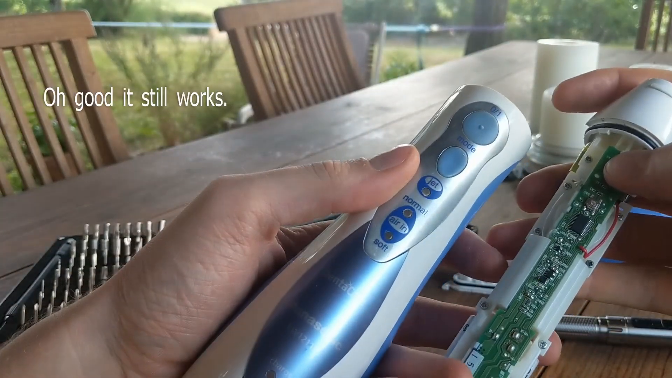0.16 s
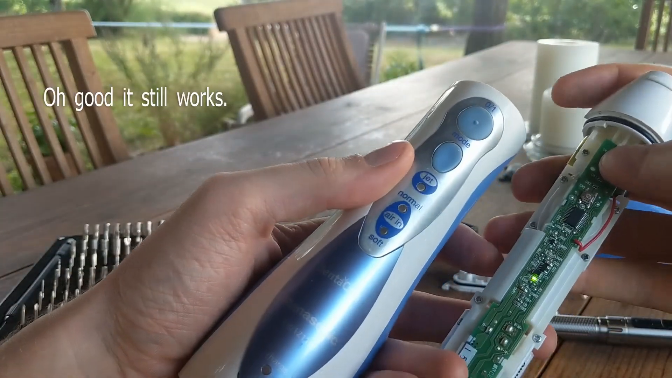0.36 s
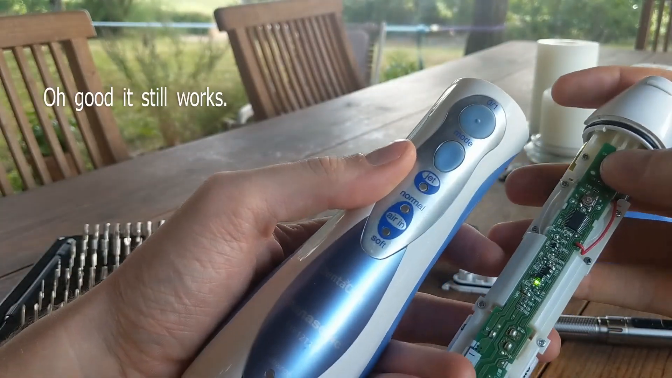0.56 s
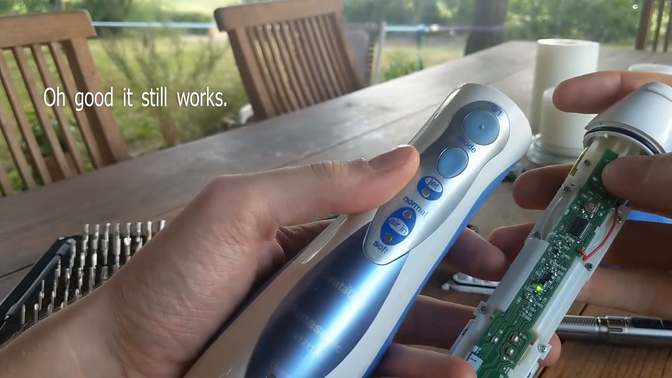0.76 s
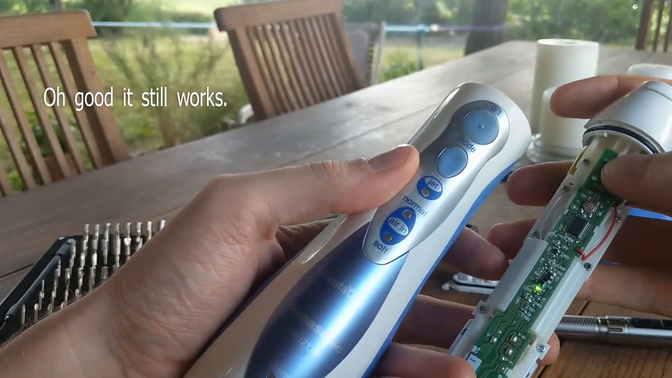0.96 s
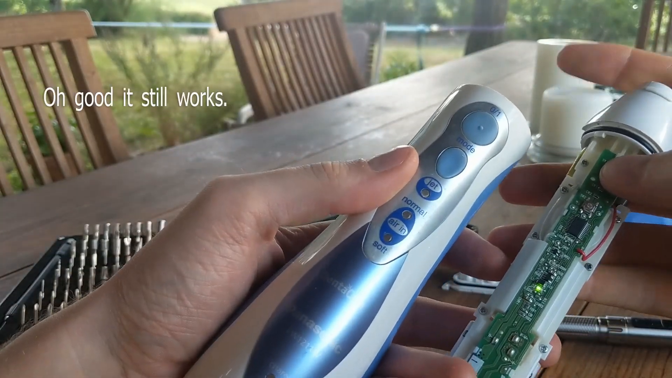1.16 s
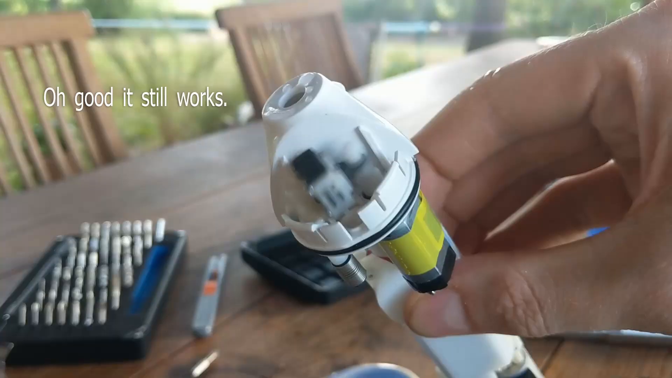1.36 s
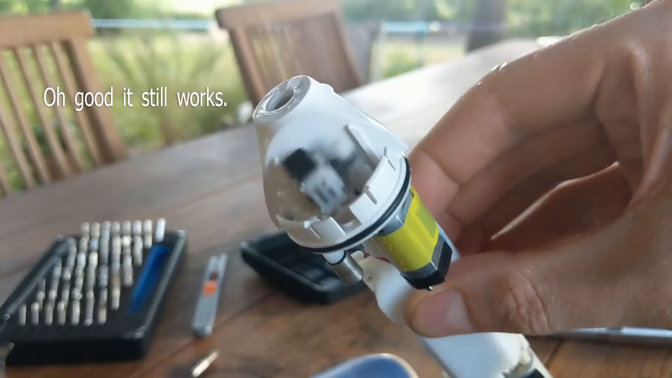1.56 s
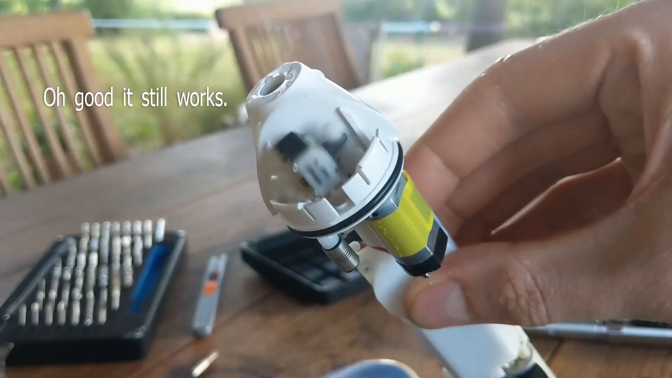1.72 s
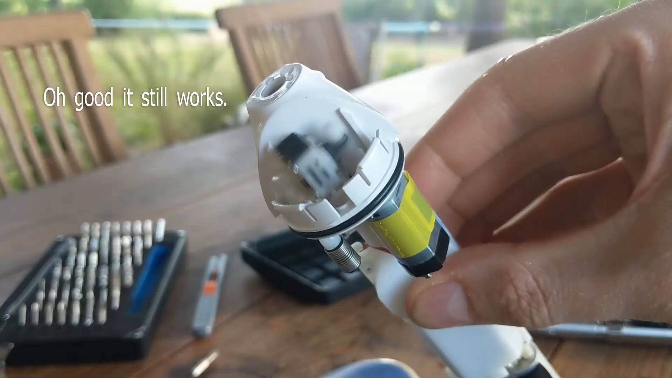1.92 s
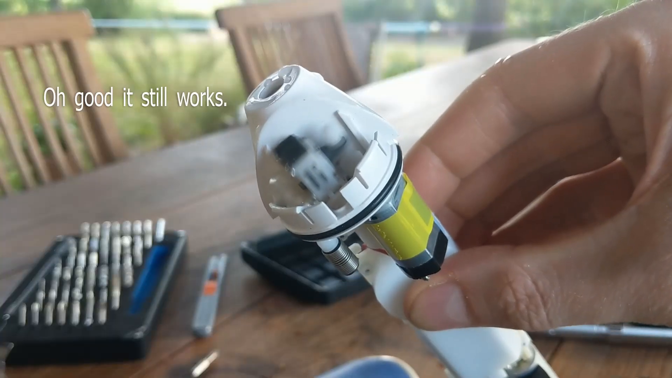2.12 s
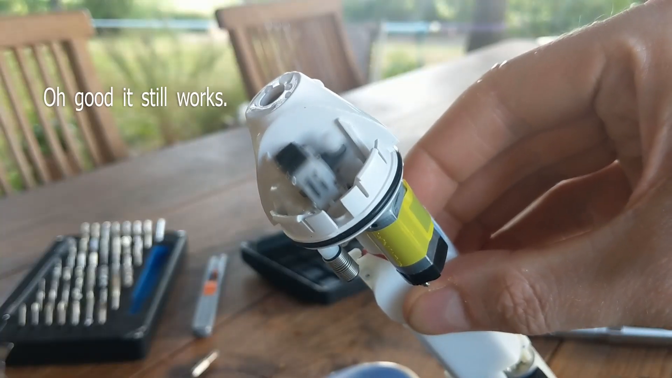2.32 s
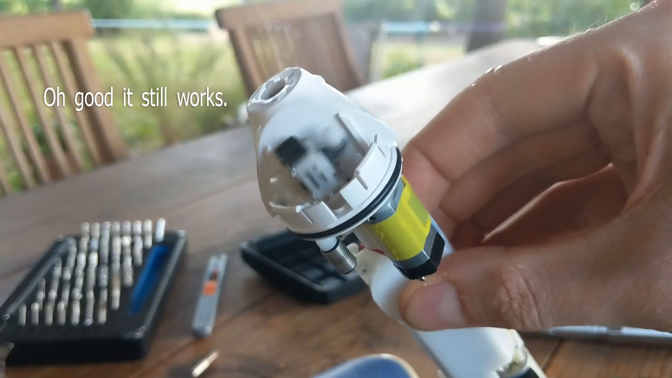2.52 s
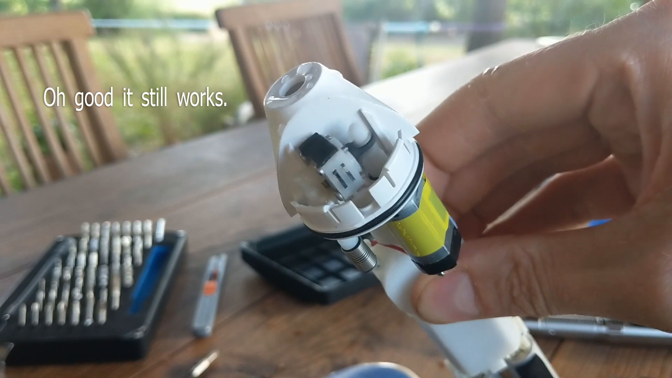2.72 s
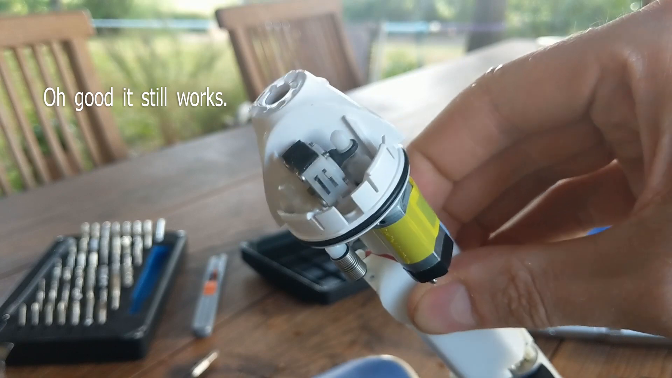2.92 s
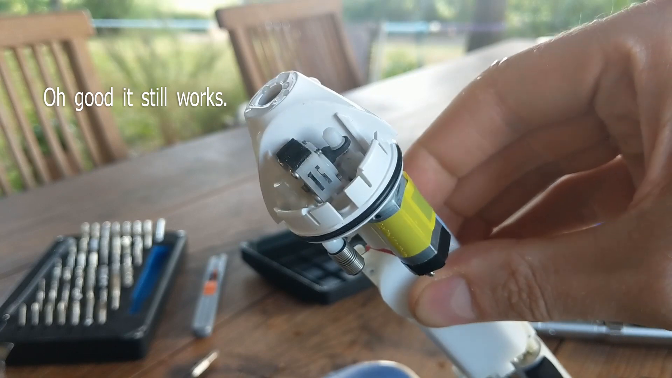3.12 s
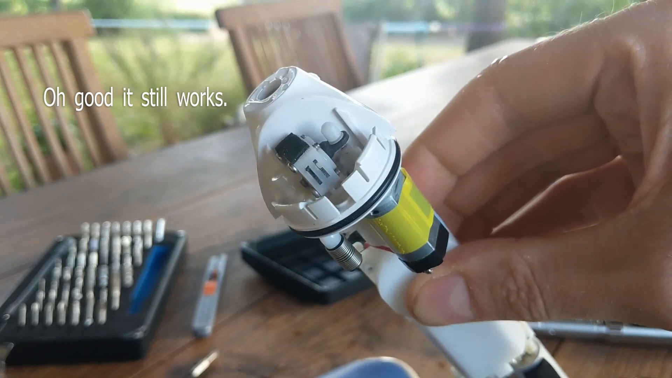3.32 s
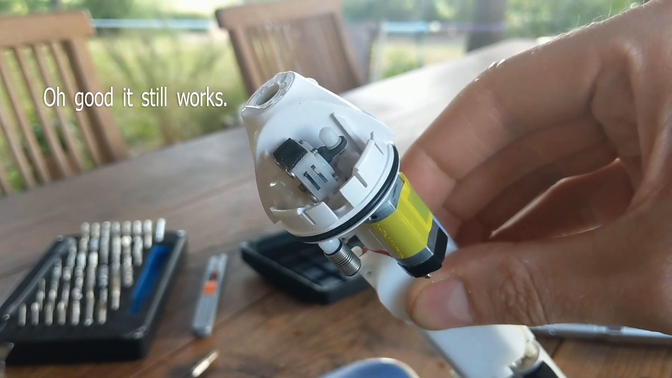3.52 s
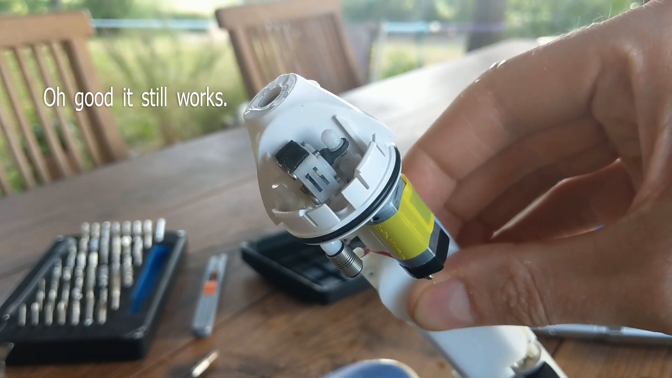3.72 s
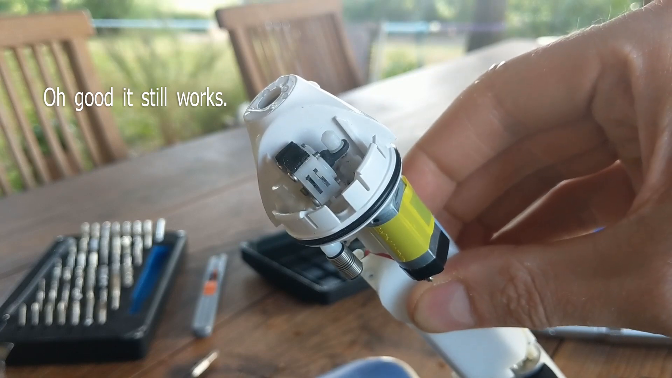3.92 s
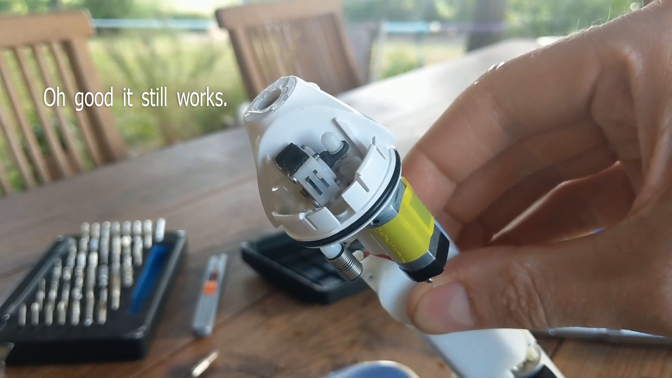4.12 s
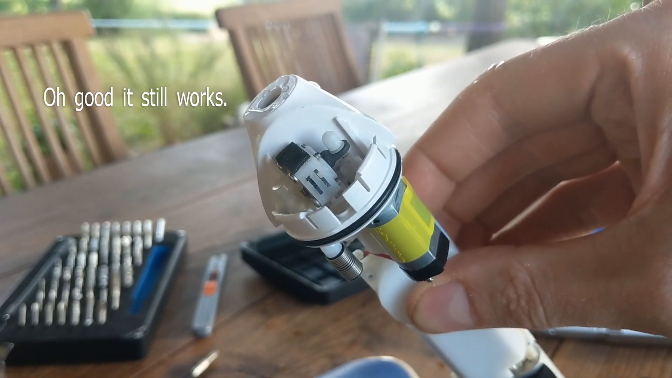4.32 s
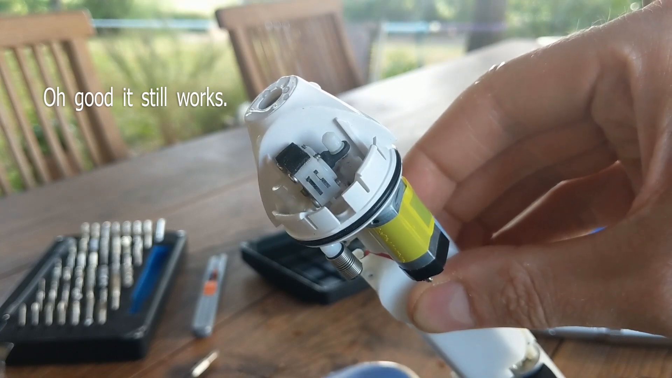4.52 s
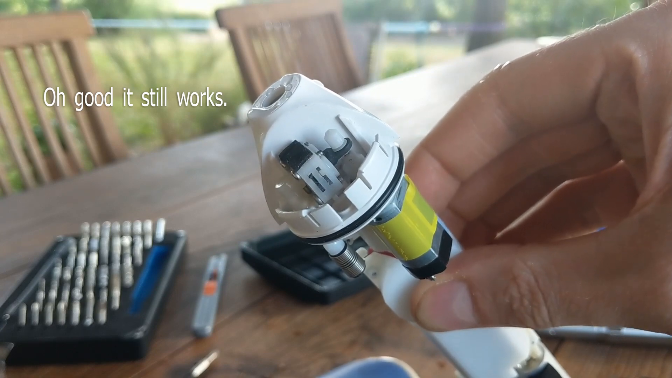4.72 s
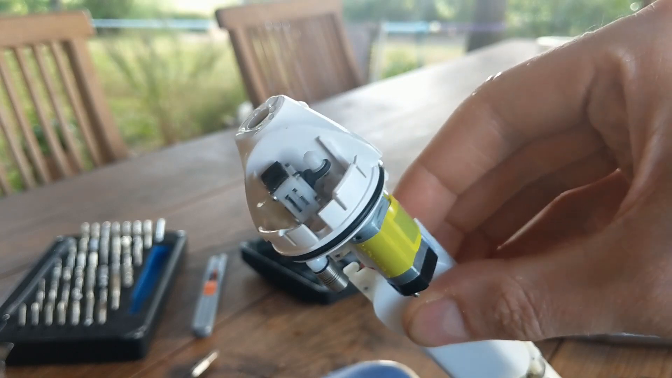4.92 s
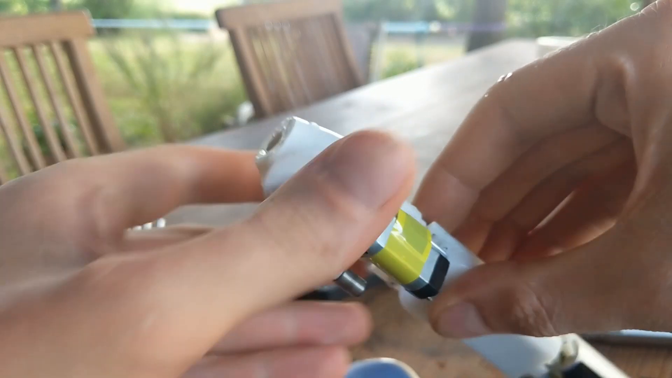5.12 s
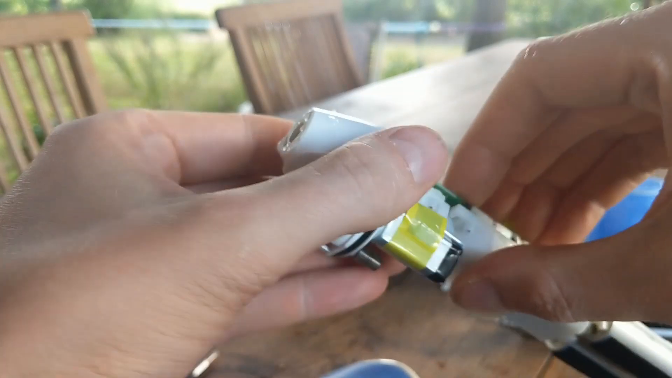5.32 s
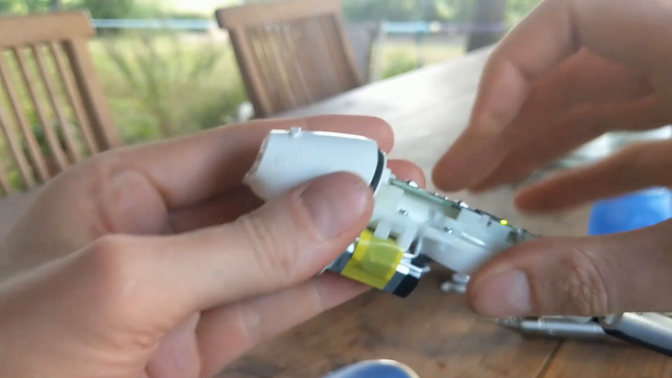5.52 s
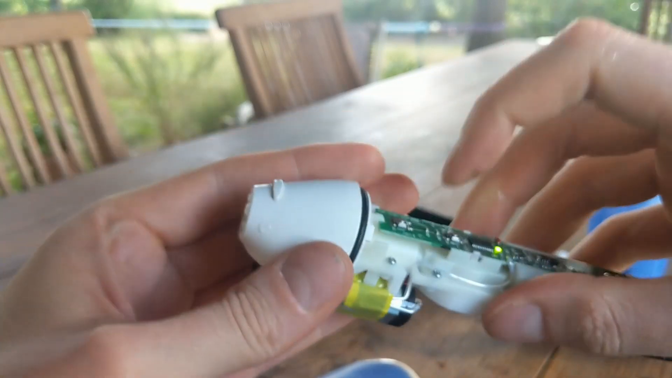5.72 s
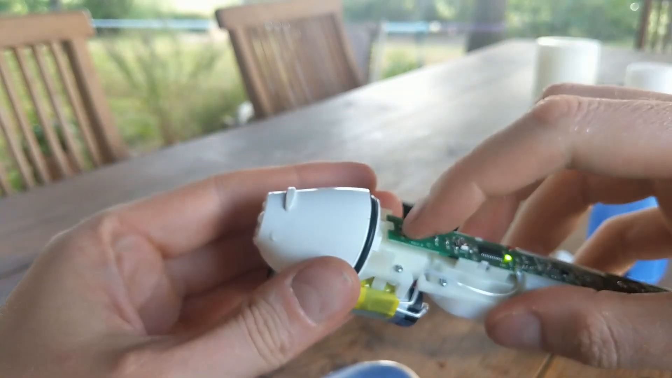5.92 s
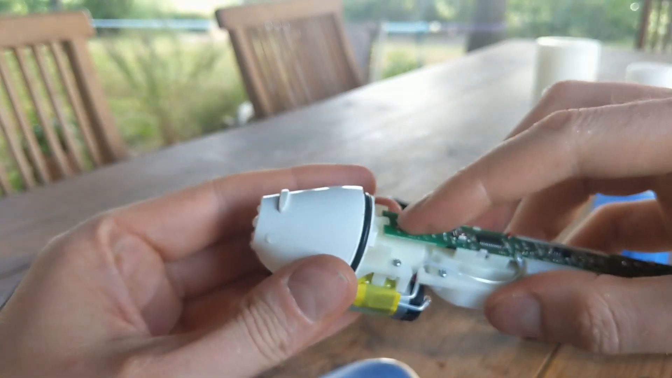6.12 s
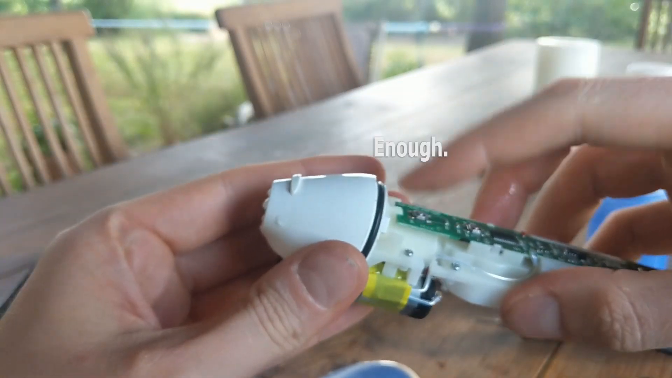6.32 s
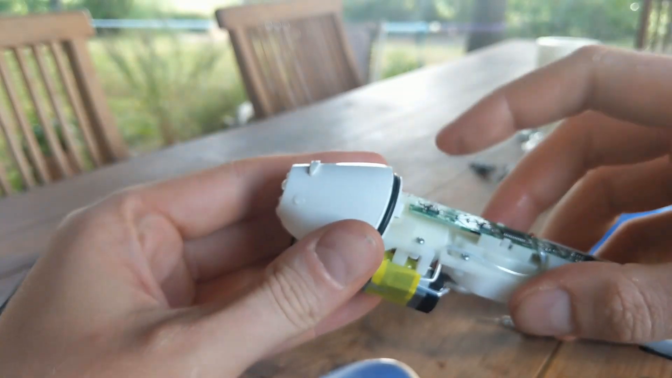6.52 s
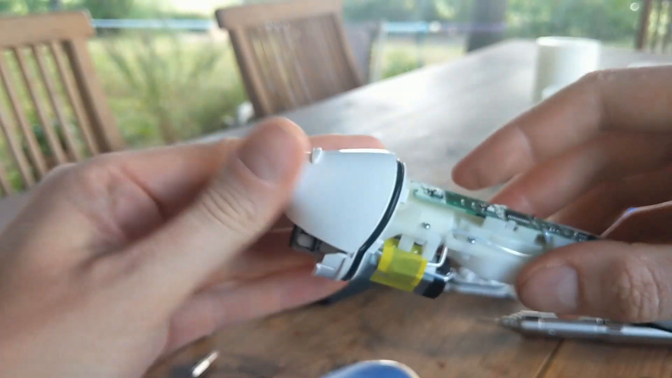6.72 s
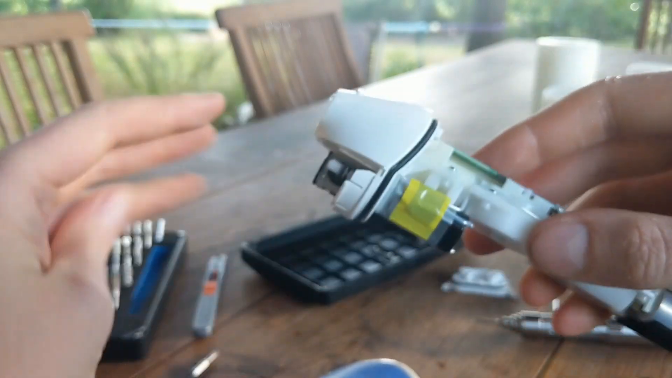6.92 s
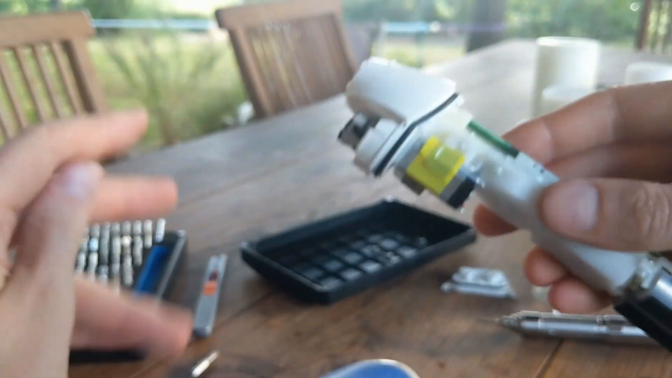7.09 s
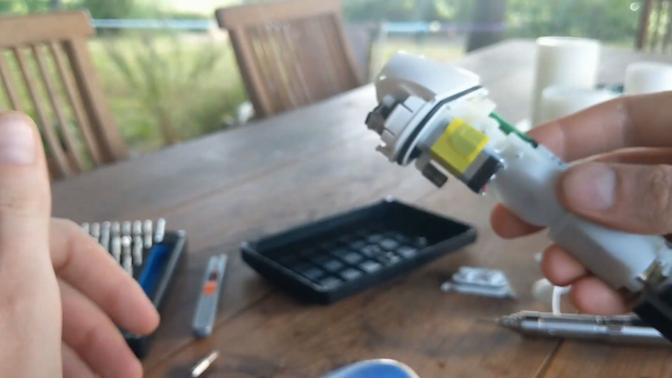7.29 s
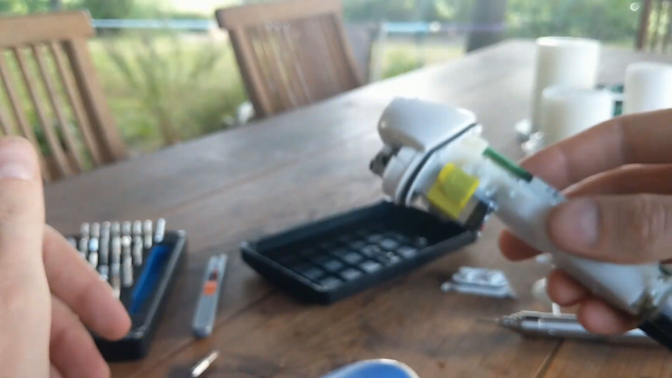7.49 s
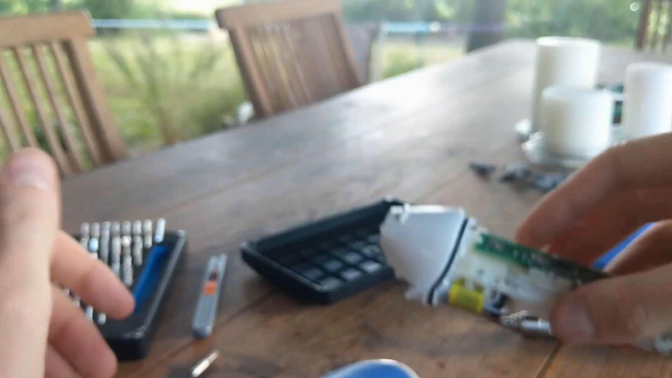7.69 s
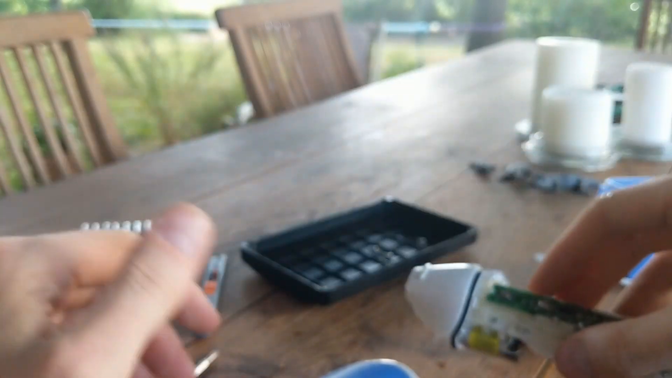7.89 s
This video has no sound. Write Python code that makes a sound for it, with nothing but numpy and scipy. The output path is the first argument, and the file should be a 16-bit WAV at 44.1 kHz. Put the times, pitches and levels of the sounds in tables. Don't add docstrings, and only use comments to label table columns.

```python
import sys
import numpy as np
from scipy import signal
from scipy.fft import rfft, irfft
from scipy.io import wavfile
from scipy.ndimage import map_coordinates

SR = 44100
rng = np.random.default_rng(int(sys.argv[2]) if len(sys.argv) > 2 else 0)


def volts_from_decibels(level):
    exponent = np.asarray(level, float) / 20
    return 10 ** exponent


def materialize(psi):
    bounded = np.clip(np.atleast_2d(psi).T, -1, 1)
    quanta = np.round(bounded * 32767).astype(np.int16)
    wavfile.write(sys.argv[1], SR, quanta)


N = 350639

CLOSER_S = 1.392
PUMP_ON_S, PUMP_OFF_S = 3.3, 6.27
# first_shift_s, second_shift_s
GRIP_SHIFTS = [(4.15, 5.67), (4.15, 5.68), (5.0, 5.47), (5.0, 5.6)]


def in_time(rows, fade=0.0039):
    t = np.arange(N) / SR
    s, *columns = np.transpose(rows)
    gate = np.clip(np.minimum(t - s[0], s[-1] - t) / fade, 0, 1)
    return [np.interp(t, s, c) for c in columns] + [gate]


def unit(x, gate=None):
    return x / np.sqrt(np.average(x ** 2, weights=gate) + 1e-20)


def after(s, fade=0.045):
    return np.clip((np.arange(N) / SR - s) / fade + .5, 0, 1)


def blend(share, old, new):
    return old + share * (new - old)


def drift(rate):
    knots = rng.standard_normal(round(rate * N / SR) + 2)
    return map_coordinates(knots, [np.linspace(0, len(knots) - 1, N)], order=3)


def body(x, modes):
    out = np.zeros(N)
    for k, (hz, width, level_db) in enumerate(modes):
        r = np.exp(-np.pi * width / SR)
        b = [(1 - r * r) / 2, 0, (r * r - 1) / 2]
        a = [1, -2 * r * np.cos(2 * np.pi * hz / SR), r * r]
        out += (-1) ** k * volts_from_decibels(level_db) * signal.lfilter(b, a, x + 1e-18)
    return out


def twice(x, hz, first_width, second_width):
    return body(body(x, [(hz, first_width, 0)]), [(hz, second_width, 0)])


def band(x, low_hz, high_hz, order=3):
    return signal.sosfilt(signal.butter(order, [low_hz, high_hz], "band", fs=SR, output="sos"), x)


def strikes(phase, spread_db):
    at = np.flatnonzero(np.diff(np.floor(phase)) > 0)
    late = np.clip((np.ceil(phase[at]) - phase[at]) / (phase[at + 1] - phase[at]), 0, 1)
    size = volts_from_decibels(spread_db * rng.standard_normal(size=2000)[:len(at)])
    out = np.zeros(N)
    out[at], out[at + 1] = size * (1 - late), size * late
    return out


def rebounds(tick, rows):
    return sum(volts_from_decibels(level_db) * np.roll(tick, round(s * SR)) for s, level_db in rows)


def surface(phase, cells, rough, grain_db=9.5):
    def bumps(size):
        height_db = grain_db * np.minimum(rng.exponential(1, size), 5)
        return unit(volts_from_decibels(height_db) * rng.choice([-1, 1], size))
    worn = bumps(cells)
    same = np.interp(phase % 1 * cells, np.arange(cells + 1), np.r_[worn, worn[0]])
    rough = np.clip(rough, 0, 1)
    return np.sqrt(1 - rough) * same + np.sqrt(rough) * bumps(N)


def load(strokes, column, rest_db):
    # start_strokes, length_strokes, knock_db, rasp_db
    pressure = [(0.217, 0.073, -1.5, -4), (.3, 0.34, -10, -36), (0.749, 0.28, -2.5, -6.5),
                (1.21, 0.15, -4, -11.5), (1.3, 0.32, -2, -71), (1.749, 0.293, -3, -7.5)]
    out = volts_from_decibels(rest_db)
    for row in pressure:
        since = (strokes % 2 - row[0]) % 2
        edge = np.minimum(since / 0.03, (row[1] - since) / 0.035)
        out = out + volts_from_decibels(row[column]) * np.clip(edge, 0, 1)
    return out


def garden():
    # hz, level_db
    air_curve = [(12, -91), (20, -28), (74, -4), (107, -12.5), (153, -17.5), (171, -19.5), (214, -17.5),
                 (253, -22.5), (749, -26), (1550, -30), (1830, -33.5), (1990, -31), (15600, -45)]
    # hz, width_hz, level_db
    drone_tones = [(65.7, 22, -12.5), (115.5, 72, -12.5), (211.4, 4.4, -16.5), (1223, 8.3, -28),
                   (1850, 46, -27)]
    t, hz = np.arange(N) / SR, np.arange(N // 2 + 1) * SR / N + 1
    at, level_db = np.transpose(air_curve)
    air_shape = volts_from_decibels(np.interp(np.log(hz), np.log(at), level_db))
    air = irfft(rfft(rng.standard_normal(N)) * air_shape, N)
    air = air / np.std(band(air, 124, 22000))
    noise = rng.standard_normal(N)
    drone = sum(volts_from_decibels(d) * unit(twice(noise, f, w, w)) for f, w, d in drone_tones)
    near = after(CLOSER_S, fade=0.054)
    drone_hz = blend(near, 68.69, 71.4) + 0.91 * drift(1.5)
    swell_db = 3.5 * np.exp(-(t - 6.2) ** 2)
    drone_db = blend(near, -80, -65.5) + 1.9 * drift(1.1) + swell_db
    drone = drone + np.sin(2 * np.pi * np.cumsum(drone_hz) / SR)
    return volts_from_decibels(-70) * air + volts_from_decibels(drone_db + 3.0) * drone


def first_controls():
    # time_s, turns_per_s
    speed_far = [(.347, 132), (.394, 133.5), (.454, 133.7), (.525, 141.8), (.55, 134.6), (.612, 137.9),
                 (.64, 136.5), (.678, 140.4), (.73, 141.9), (.76, 127.9), (.932, 134.7), (1.008, 139.5),
                 (1.108, 135.2), (1.302, 133.7), (1.39, 135)]
    speed_near = [(1.4, 137.6), (1.468, 136.1), (1.504, 144.5), (1.562, 143.2), (1.658, 144.3),
                  (1.714, 142.7), (1.784, 143.7), (1.848, 142), (1.88, 142.9), (1.906, 128.5),
                  (1.93, 128.2), (1.958, 132.7), (2.112, 131.3), (2.25, 133), (2.646, 132.6),
                  (2.686, 131.2), (2.855, 130.7)]
    # time_s, level_db
    level_far = [(.347, -44), (.456, -41.5), (.522, -42.5), (.558, -42), (.73, -42.5), (.768, -46.5),
                 (1.012, -42), (1.136, -45), (1.39, -46)]
    level_near = [(1.401, -37), (1.468, -39), (1.503, -34), (1.878, -35), (1.902, -45), (2.25, -43),
                  (2.649, -42), (2.69, -43), (2.857, -41.5)]
    # from_s, to_s, onset_s
    drag_times = [
        (.86, 1.51, .12),
        (1.89, 2.83, .03),
    ]
    drag_levels = [-56.5, -53]
    t, near = np.arange(N) / SR, after(CLOSER_S, fade=0.0031)
    speed, _ = in_time(speed_far + speed_near)
    level_db, gate = in_time(level_far + level_near, fade=0.00099)
    stall_s, fall_s, rise_s, stall_db = 1.215, .1, .04, -9
    stall = np.clip(np.minimum(1 + (t - stall_s) / fall_s, 1 - (t - stall_s) / rise_s), 0, 1)
    level_db = level_db + stall_db * np.minimum(3.1 * stall, 1)
    since = np.maximum(t - level_far[0][0], 0)
    rise_db = -10 * np.exp(-since / 0.04)
    bright_db = level_db + blend(near, -12, -7) - 26 * np.exp(-since / 0.052)
    hum_db = blend(near, -67.5, -66) + rise_db + 0.2 * stall_db * stall
    drags = [after(start, fade=onset) - after(end, fade=0.0067) for start, end, onset in drag_times]
    dragging, free_db = sum(drags), -78
    gear_db = free_db + sum(on * (drag_db - free_db) for on, drag_db in zip(drags, drag_levels))
    rough = blend(dragging, blend(near, 0.18, 0.1), 0.22)
    speed = speed + .1 * near * (1 - dragging) * np.sin(2 * np.pi * (30 * t + .95))
    speed = speed - 28.01 * stall - 40 * np.exp(-since / .016)
    return speed, level_db + rise_db, bright_db, hum_db, gear_db, rough, gate


def rotor_hum(turn, near):
    # multiple, level_db
    far_orders = [(1, -2), (2, -9), (3, -16.5), (4, -19), (5, -16.5), (6, -15), (7, -13.5), (8, -13),
                  (9, -15.5), (10, -14), (11, -14.5), (12, -15), (13, -15), (14, -5), (15, -15), (16, -12)]
    near_orders = [(1, 2), (2, -4), (3, -19), (4, -7.5), (5, -2.5), (6, -2), (7, -27), (8, -11), (9, -17),
                   (10, -4.5), (11, -5.5), (12, -12), (13, -20), (14, -15), (15, -8.5), (16, -22)]
    hum = 0
    for (k, far_db), (_, near_db) in zip(far_orders, near_orders):
        level_db = blend(near, far_db - far_orders[1][1], near_db - near_orders[1][1])
        hum = hum + np.sqrt(2) * volts_from_decibels(level_db) * np.sin(2 * np.pi * (k * turn + rng.random()))
    return hum


def gear(strokes, rough):
    # place_strokes, level_db
    pin_blows = [(.265, -1.5), (.345, 0.5), (.43, -3.5), (0.774, 2.5), (0.851, 3.5), (0.941, 7)]
    blows = sum(volts_from_decibels(level_db) * strikes(strokes - at, spread_db=1.2) for at, level_db in pin_blows)
    grind = surface(strokes, 1600, rough, grain_db=-1.5) * load(strokes, 2, rest_db=-10.5)
    return 4.2 * blows + 0.65 * grind


def first_run():
    # hz, width_hz, level_db
    frame_far = [(3170, 270, -7.5), (3910, 170, -6.5), (4770, 200, 1.5), (5110, 220, -7), (5490, 110, -12)]
    frame_near = [(2887, 280, 1.5), (3360, 190, 0), (3860, 260, 0.5), (4160, 130, 2), (4950, 360, 3),
                  (5500, 210, 0), (5800, 1700, -10.5)]
    bright_far = [(5830, 1250, -7.5), (8160, 85, 1), (8460, 560, -9), (8970, 850, -8.5), (13500, 4400, -28)]
    bright_near = [(6500, 2380, -1), (8400, 243, 10), (9490, 490, -2.5), (12630, 2500, -56)]
    gear_modes = [(303, 78, -0.5), (740, 200, 2.5), (1300, 910, -5)]
    # hz, width_hz, level_db
    whine = [
        (2620, 580, 1),
        (2653, 480, -9.5),
        (2736, 360, -6),
    ]
    # delay_s, level_db
    near_bounce = [(.0, 0.), (.0011, -7.), (.0022, -3.)]
    far_bounce = [(.0, -9.5), (.0011, -16), (.0022, -24)]
    loaded_bounce = [(.0, -8), (.00113, -15), (.00377, -6)]
    speed, frame_db, bright_db, hum_db, gear_db, rough, gate = first_controls()
    turn = np.cumsum(speed * (gate > 0)) / SR + .8
    near, loaded = after(CLOSER_S, fade=0.0035), after(1.89)

    tick = 15 * strikes(turn, spread_db=.25)
    far_taps, taps, loaded_taps = [rebounds(tick, rows) for rows in (far_bounce, near_bounce, loaded_bounce)]
    rub = (5.5 * rough ** 2 + 0.15 * loaded + 0.02) * surface(turn, 320, 0.18, grain_db=2.5)
    drag_on = np.exp(-((turn % 1 - .25) / 0.22) ** 2) + 0.2
    far_hit = 0.5 * tick + .5 * surface(turn, 320, .8 * rough, grain_db=2.5) * drag_on
    near_hit = taps + 7.7 * rub * drag_on

    far_share = volts_from_decibels(-12 * (1 - after(.374, fade=0.0036))) - near
    frame = far_share * unit(body(far_hit, frame_far)) + near * unit(body(near_hit, frame_near))
    shares, blows = (1 - near, near - loaded, loaded), (far_taps, taps, loaded_taps)
    for share, blow, (hz, width, level_db) in zip(shares, blows, whine):
        ring = twice(blow + 1.6 * rub * drag_on, hz, width, width)
        frame = frame + share * volts_from_decibels(level_db) * unit(ring)
    mesh = volts_from_decibels(-5 + 1.5 * drift(30.0)) * drag_on * np.sin(2 * np.pi * 35 * turn)
    frame = band(frame + (1 - near) * mesh, 2150, 9200, order=3)

    first_tap = tick + 13.2 * rub * (np.exp(-(turn % 1) / 0.086) + 0.065)
    bright = (1 - near) * unit(body(far_hit + 0.37 * tick, bright_far))
    bright = band(bright + near * unit(body(first_tap, bright_near)), 2900, 21400, order=2)
    drag = unit(body(gear(turn / 6.5, 0.45) + 0.12 * rng.standard_normal(N), gear_modes))
    out = volts_from_decibels(frame_db - 6.5) * frame + volts_from_decibels(bright_db) * bright
    return gate * (out + volts_from_decibels(hum_db) * rotor_hum(turn, near) + volts_from_decibels(gear_db - 2.5) * drag)


def hit(s, level_db, hz, t60):
    t = np.arange(1500) / SR
    ring = np.sin(2 * np.pi * hz * t) * volts_from_decibels(-60 * t / t60) * np.minimum(t / 0.00052, 1)
    return round(s * SR), volts_from_decibels(level_db) * ring


def lay(hits):
    out = np.zeros(N)
    for at, ring in hits:
        out[at:at + len(ring)] += ring
    return band(out, 1220, 13000, order=2)


def piston_knocks():
    # time_s, peak_db, pitch_hz, upper_ring_db
    knocks = [(0.866, -31, 1780, 8), (.8745, -25, 1810, -8), (0.8788, -30, 1700, -8),
              (0.885, -40, 1710, -5), (0.9148, -18.5, 2010, -6), (0.927, -35, 1520, -5),
              (0.961, -27, 1750, 1), (1.009, -22.5, 2100, -7), (1.0597, -22.5, 1980, -23),
              (1.11, -30, 1850, -1), (1.149, -35, 1650, -13), (1.157, -36, 1550, -10),
              (1.176, -43, 2000, -3), (1.1672, -27.5, 2090, 1.5), (1.2233, -27, 1980, -23),
              (1.275, -28, 2000, -3), (1.3292, -25, 1913, -20), (1.383, -24.5, 2100, 0.5),
              (5.4118, -21, 1740, -10)]
    hits = [hit(s, level_db, hz, 0.01) for s, level_db, hz, _ in knocks]
    hits += [hit(s, level_db + upper_db, 2443, 0.013) for s, level_db, _, upper_db in knocks]
    return lay(hits)


def rustles():
    # time_s, length_s, level_db, pitch_hz
    puffs = [(1.151, 0.0098, -42.5, 4540), (7.286, .03, -64.5, 256), (2.845, 0.11, -49.5, 4130),
             (3.283, 0.035, -57, 1520), (3.284, 0.0075, -49, 6500), (3.291, 0.0082, -40, 3600),
             (3.274, 0.025, -60, 4760), (6.335, 0.045, -68, 6500), (6.344, 0.044, -59, 4300),
             (6.472, 0.0071, -66, 7300), (7.018, 0.037, -72, 7200), (7.071, 0.028, -66.5, 6600),
             (7.075, .02, -90, 4800), (7.248, .05, -76, 7360), (7.314, 0.05, -74, 7700)]
    t = np.arange(N) / SR
    grains = surface(np.zeros(N), 4, 1, grain_db=4.0)
    out = np.zeros(N)
    for s, length, level_db, hz in puffs:
        swell = np.exp(-((t - s) / (length / 2)) ** 2)
        out += volts_from_decibels(level_db) * unit(band(grains, hz * 0.53, hz * 1.28, order=2)) * swell
    return out


def button_clicks():
    # time_s, peak_db, low_ring_db, high_ring_db; the rows after 6.3 s are the pump's last clicks as it stops
    presses = [(2.817, -2.5, -9, -17), (2.8234, 1, -11, -4), (2.8654, 1, -10.5, -7.5), (2.907, -33.5, 5, 6),
               (3.288, 2.5, -11, -10), (3.329, -6.5, -11, -15), (6.311, -21, -5, -11),
               (6.3434, -31, 8, -24), (6.377, -29, -35, -15)]
    # hz, t60_s
    rings = [(1400, 0.0064), (3800, 0.0052), (6300, 0.005)]
    hits = []
    for s, level_db, low_db, high_db in presses:
        for (hz, t60), ring_db in zip(rings, (low_db, 0, high_db)):
            hits.append(hit(s, level_db + ring_db - 14.5, hz * .97, t60))
            hits.append(hit(s, level_db + ring_db - 23, hz * 1.045, t60))
    return lay(hits)


def reversals(strokes):
    # place_strokes, level_db
    pin_blows = [(.235, 0), (.735, -1)]
    # place_strokes, case_db, neck_db
    damping = [(0, -7, 2), (.22, -10, 3), (.232, 2, 7), (.4, 6, 1), (.45, 4.5, 10), (.72, 9.5, 14),
               (.732, -13, -24), (.9, 6.5, 23.5), (.97, 18.5, 14), (1, 1, -10)]
    blows = sum(volts_from_decibels(level_db) * strikes(strokes - at, spread_db=0.14) for at, level_db in pin_blows)
    grind = surface(strokes / 2, 3200, .2, grain_db=1.0) * load(strokes, 2, rest_db=-14)
    at, *damped_db = np.transpose(damping)
    return 8 * blows + volts_from_decibels(-17) * grind, [volts_from_decibels(np.interp(strokes % 1, at, d)) for d in damped_db]


def second_levels(a, b):
    # first_grip_db, second_grip_db, third_grip_db
    part_levels = [
        (-53.5, -54.5, -52.5),
        (-51, -53.5, -54),
        (-43, -44.5, -45.5),
        (-44, -45.5, -42),
    ]
    run_down = (-120, -150, -260, -320)
    off_s = np.maximum(np.arange(N) / SR - PUMP_OFF_S, 0)
    soft_db = -3 * (1 - after(PUMP_ON_S + 0.038, fade=.01))
    gate = after(PUMP_ON_S, fade=0.0057) - after(6.355, fade=0.0082)
    levels_db = []
    for (first_db, second_db, third_db), fall in zip(part_levels, run_down):
        grip_db = first_db + a * (second_db - first_db) + b * (third_db - second_db)
        levels_db.append(grip_db + soft_db + fall * off_s)
    return levels_db, gate


def gripped(source, modes, shifts, sign):
    a, b = after(shifts[0], fade=0.13), after(shifts[1], fade=0.2)
    out = np.zeros(N)
    for k, (hz, width, first_db, second_db, third_db) in enumerate(modes):
        level = (1 - a) * volts_from_decibels(first_db) + (a - b) * volts_from_decibels(second_db) + b * volts_from_decibels(third_db)
        out += sign ** k * level * body(source, [(hz, width, 0)])
    return out


def pings(strokes):
    # place_strokes, hz, width_hz, early_db, last_grip_db
    contacts = [(.94, 3720, 251, -27.5, -32), (1.79, 2940, 300, -36, -31)]
    late, running = after(GRIP_SHIFTS[0][1], fade=0.2), 1 - after(PUMP_OFF_S)
    out = np.zeros(N)
    for place, hz, width, early_db, late_db in contacts:
        ring = twice(strikes((strokes - place) / 2, spread_db=1.0), hz, width, 2 * width)
        out += volts_from_decibels(blend(late, early_db, late_db)) * 20 * running * ring
    return out


def tooth_snaps(strokes):
    # time_s, even_strokes_db, odd_strokes_db
    snap_levels = [(3.3, 29, 10), (3.7, 19, 27), (4.3, 11, 30), (5.0, 11, 15), (5.3, 14, 10), (5.5, 32, 10),
                   (5.75, 37.5, 15), (6.3, 36, 15)]
    even_db, odd_db, _ = in_time(snap_levels)
    snap = volts_from_decibels(even_db) * strikes((strokes - .25) / 2, spread_db=1.2)
    snap = snap + volts_from_decibels(odd_db) * strikes((strokes - 1.25) / 2, spread_db=1.2)
    snap = snap + .35 * np.roll(snap, 60)
    ring = body(snap, [(6300, 310, 10.0), (7700, 780, 5.5), (3100, 310, -3.5)])
    return band(ring, 2500, 9100, order=2) + body(snap, [(11500, 820, -19)])


def second_run():
    # time_s, strokes_per_s
    pump_speed = [(3.3, 27.48), (3.45, 29.63), (3.6, 29.47), (3.8, 28.66), (4.1, 28.18), (5.0, 27.25),
                  (5.55, 27.71), (5.7, 27.25), (6.28, 27.21)]
    # hz, width_hz, first_grip_db, second_grip_db, third_grip_db
    case_modes = [(327, 137, -8.5, -28, -28), (377.4, 37, -9, -5, -8), (612, 64, -3.5, -12, -15.5),
                  (764, 110, -2.5, 1, -0.5), (811, 144, -0.5, -8, -4.5), (960, 26, -18, -19, -6)]
    neck_modes = [(1231, 108, -3, 0.5, -5.5), (1392, 124, -4, -1.5, -5.5), (1550, 137, -12.5, -9, -4.5)]
    frame_modes = [(2340, 2130, -9.5, -8.5, -6), (2910, 540, -3.5, -5.5, 0), (3290, 144, -5.5, -2, -7),
                   (3400, 110, -2.5, -2, -4.5), (3720, 240, -2.5, -8, -4.5), (4370, 234, -6, -4.5, 0),
                   (4565, 126, 2, -2, -4), (4760, 254, -3, 1.5, -2), (5316, 304, -3, -14, -1)]
    cap_modes = [(5700, 830, -5, -9, -7.5), (6490, 330, -10, -8, -5.5), (7300, 310, -2.5, -16, -2),
                 (7970, 340, 4, 7, -1.5), (8460, 910, -1.5, 1, -3.5)]
    # hz, width_hz, level_db
    sheen = [(10000, 330, -27), (11730, 1900, 17.5), (13400, 3500, 13.5)]
    speed, _ = in_time(pump_speed)
    speed = speed * (1 - 0.4 * after(6.3, fade=0.03))
    strokes = (np.cumsum(speed) - np.sum(speed[:round(PUMP_ON_S * SR)])) / SR
    knock, (case_free, neck_free) = reversals(strokes)
    weak_db = -2 * ((strokes - .45) % 2 < 1.1)
    rub = surface(strokes / 2, 3200, .7, grain_db=2.0)
    mixed = rub * load(strokes, 3, rest_db=-6) * volts_from_decibels(.3 * weak_db)
    rasp = rub * load(strokes, 3, rest_db=-16) * volts_from_decibels(weak_db)

    case = case_free * gripped(knock, case_modes, GRIP_SHIFTS[0], -1)
    neck = neck_free * gripped(knock, neck_modes, GRIP_SHIFTS[1], -1)
    frame = gripped(mixed, frame_modes, GRIP_SHIFTS[2], -1)
    cap = gripped(rasp, cap_modes, GRIP_SHIFTS[3], 1)
    cap = 1.27 * unit(band(cap, 5180, 7320, order=2)) + volts_from_decibels(-14.5) * unit(body(rasp, sheen))
    first_s, second_s = GRIP_SHIFTS[0]
    levels_db, gate = second_levels(after(first_s, fade=1.0), after(second_s, fade=0.28))
    out = sum(volts_from_decibels(level_db) * unit(part, gate) for part, level_db in zip((case, neck, frame, cap), levels_db))
    return gate * (out + pings(strokes) + volts_from_decibels(levels_db[3]) * tooth_snaps(strokes))


def coast():
    done = (np.arange(N) / SR - 6.335) / .046
    ticks_per_s = np.interp(done, [0, 1], (330, 120)) * (done > 0) * (done < 1)
    ticks = strikes(np.cumsum(ticks_per_s) / SR, spread_db=10.0)
    return volts_from_decibels(-46.5) * 20 * band(body(ticks, [(4300, 350, 0)]), 3600, 5800, order=3)


def scene():
    air_and_drone = garden()
    device = first_run() + piston_knocks() + rustles() + button_clicks() + second_run() + coast()
    echo = signal.lfilter([.5], [1, -.5], device)
    device = device + volts_from_decibels(-20.0) * np.roll(echo, 130) + volts_from_decibels(-19.0) * np.roll(echo, 520)
    return np.array([volts_from_decibels(4) * (device + air_and_drone), np.zeros(N)])


def top_cut(x):
    return signal.sosfilt(signal.butter(12, 15790, fs=SR, output="sos"), x)


def record(dry):
    cut = signal.sosfilt(signal.cheby2(12, 70, 16400, fs=SR, output="sos"), dry)
    return top_cut(cut)


dry = scene()
out = record(dry)
materialize(out)
```